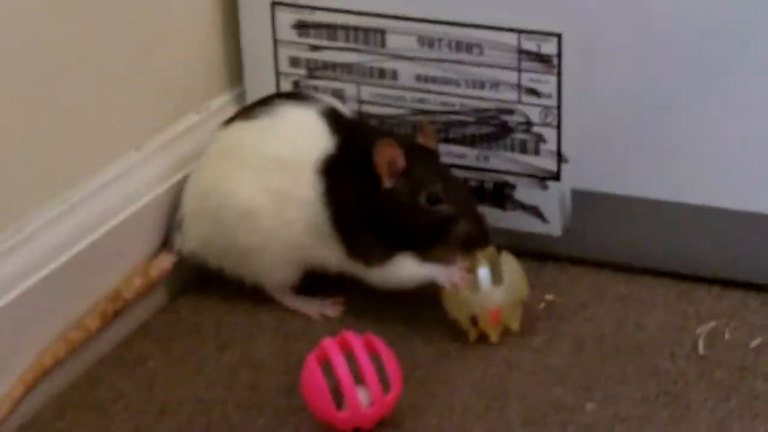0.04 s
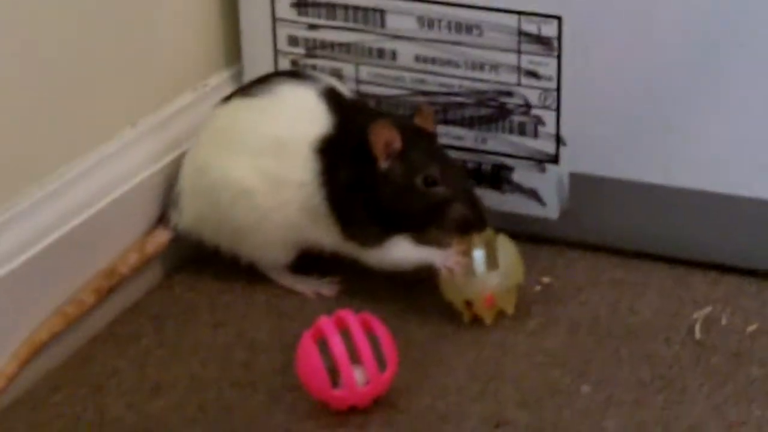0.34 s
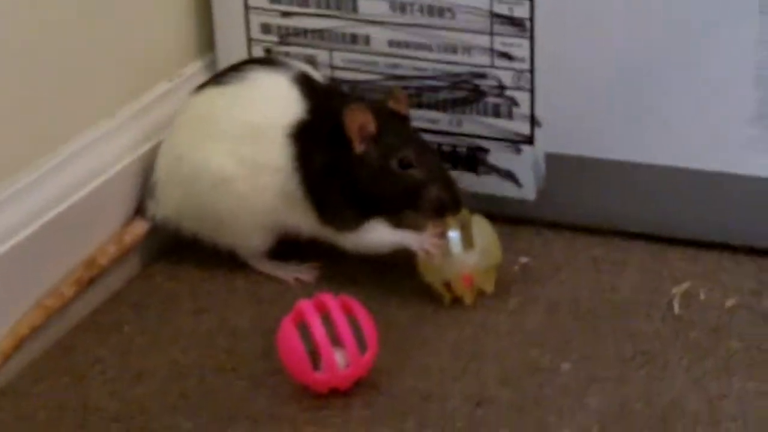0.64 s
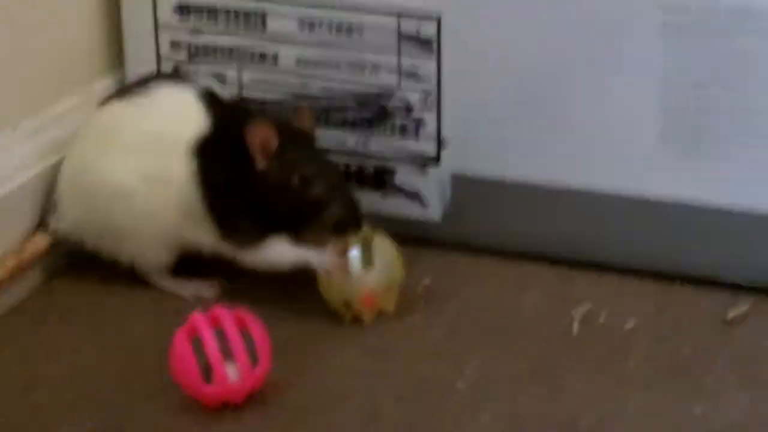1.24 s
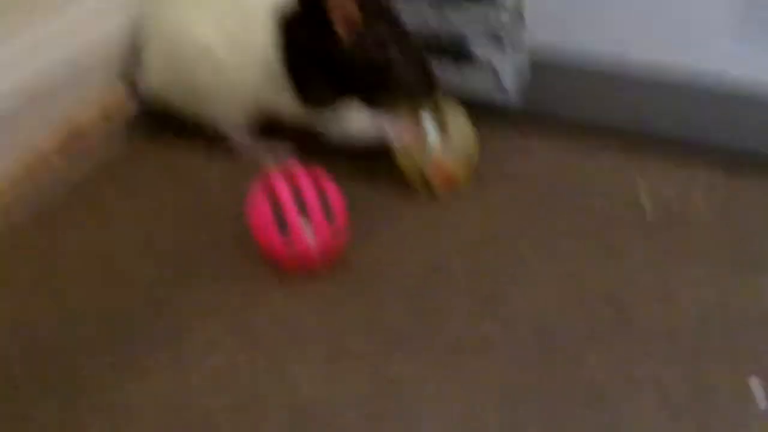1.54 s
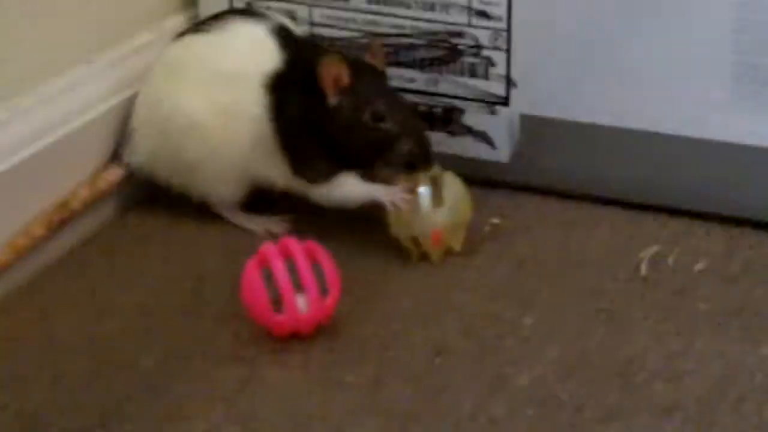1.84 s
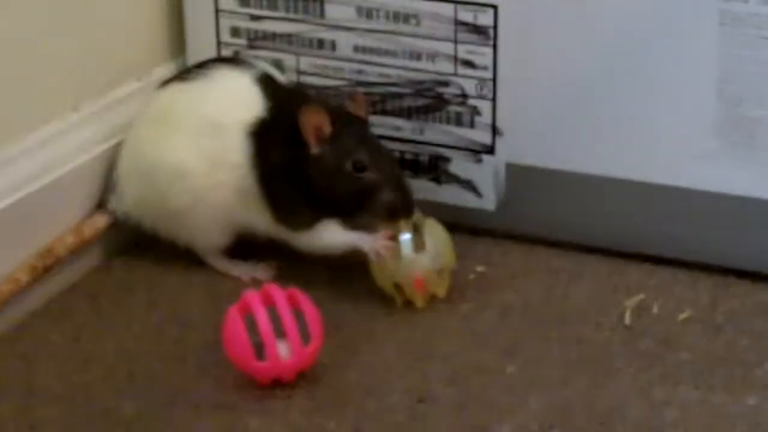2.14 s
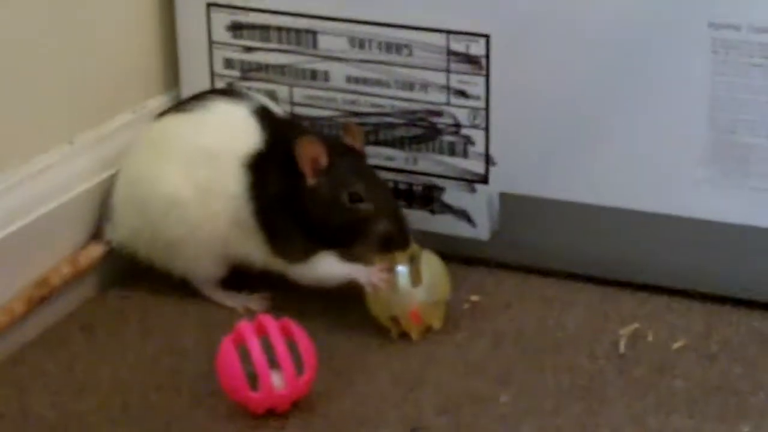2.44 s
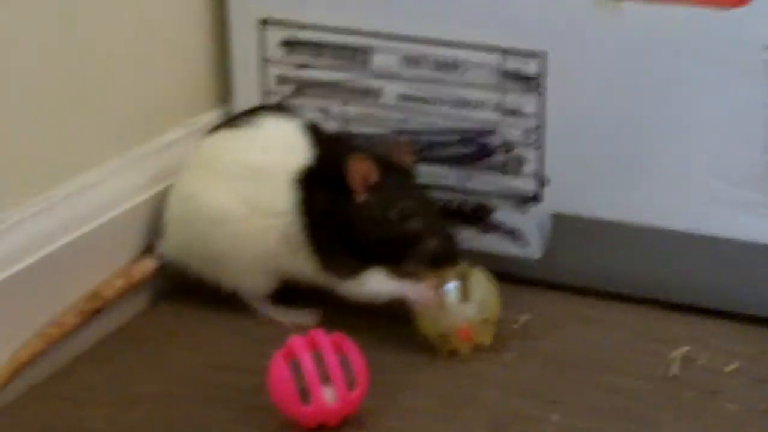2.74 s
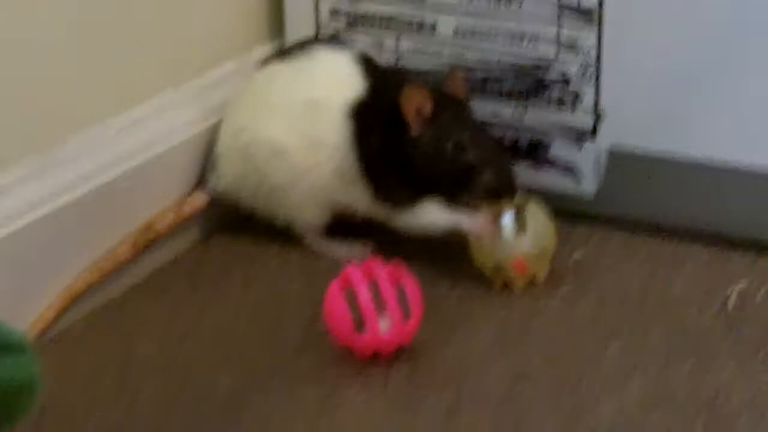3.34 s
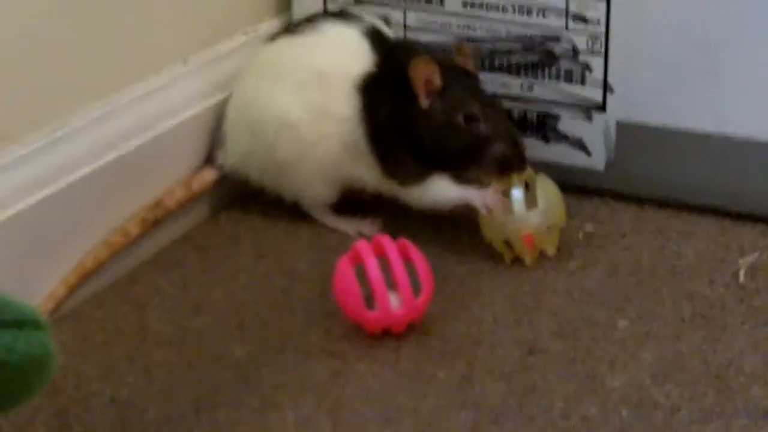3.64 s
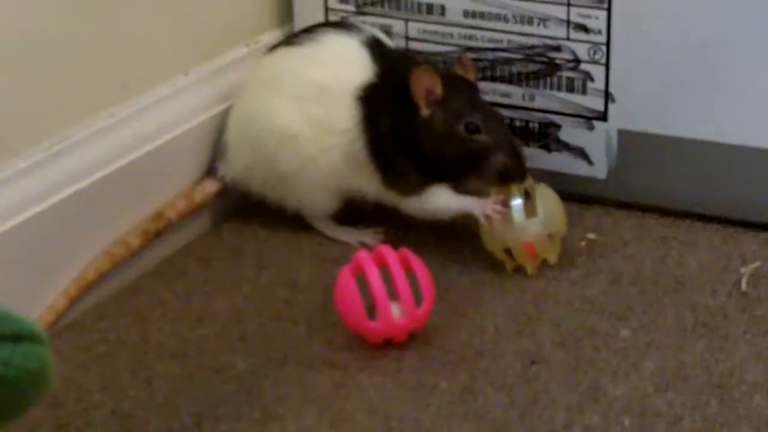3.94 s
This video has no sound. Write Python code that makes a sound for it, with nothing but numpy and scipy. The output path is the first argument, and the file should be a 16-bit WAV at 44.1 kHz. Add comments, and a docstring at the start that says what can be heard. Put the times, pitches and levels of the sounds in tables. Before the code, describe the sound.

A rat gnaws a hollow plastic ball, making light, irregular clicks in a quiet room.

```python
"""Sharp, hollow ticks come first: a rat's teeth and claws on a slotted plastic ball on a carpet.
A moment later the pellet inside touches a small bell and damps its ring.
Under it all lie a quiet room's low rumble and faint hiss, a distant fan's whirr and a motor hum.
Now and then paws scrape softly on the ball, and a hand-held camera rumbles twice as it moves."""
import sys
import numpy as np
from scipy import signal
from scipy.fft import rfft, irfft
from scipy.io import wavfile

SR = 44100
rng = np.random.default_rng(int(sys.argv[2]) if len(sys.argv) > 2 else 0)


def waveform_to_disk(signal):
    """Save audio, clipped to [-1, 1], as 16-bit WAV at the path in sys.argv[1]."""
    frames = np.transpose(np.atleast_2d(signal))
    scaled = np.clip(frames, -1, 1) * 32767
    samples = np.round(scaled).astype(np.int16)
    wavfile.write(sys.argv[1], SR, samples)


N = 176400  # 4 seconds


def amp(db):
    return 10 ** (np.asarray(db) / 20)


def unit(x):
    """Scales a sound to an average power of 1."""
    return x / np.sqrt(np.mean(x ** 2) + 1e-20)


def level_at(points, hz):
    """Reads between the rows of a frequency table, on a log-frequency axis."""
    f, db = np.transpose(points)
    return np.interp(np.log(hz + 1), np.log(f + 1), db)


def add(mix, start_s, sound):
    part = mix[max(round(start_s * SR), 0):][:len(sound)]
    part += sound[:len(part)]


def tone_filter(gain):
    """A filter with these gains that never rings before the hit (minimum phase)."""
    log_gain = np.log(np.maximum(np.r_[gain, gain[-2:0:-1]], 1e-5))
    return np.fft.ifft(np.exp(np.conj(signal.hilbert(log_gain)))).real


def noise(gain):
    """Steady noise with this gain at each frequency."""
    return irfft(rfft(rng.standard_normal(N)) * gain, N)


def drift(rate_hz):
    """A smooth random wobble of about size 1."""
    hz = np.fft.rfftfreq(N, 1 / SR)
    return unit(noise(np.exp(-(hz / rate_hz) ** 2)))


def burst(t, decay_s, rise_s=1e-5):
    """A puff of noise that swells and dies, with energy 1."""
    puff = rng.standard_normal(len(t)) * np.exp(-t / decay_s) * (1 - np.exp(-(t / rise_s) ** 2))
    return puff / np.linalg.norm(puff)


BODY_EDGE_HZ = 4700  # the shell's low "body" lies below this
# The notes the plastic shell rings at: f/Hz, relative level/dB, time to fade by 60 dB/s
SHELL_NOTES = [(1640, -18, 0.055), (1950, -29, 0.014), (2330, -29, 0.035), (3000, -15, 0.017),
               (3560, -21, 0.034), (6100, -21, 0.012), (6310, -27, .02), (7900, -17.5, 0.013)]
def shell_ring(t, body_db, ring_db=-11.5, spread_db=2, detune=.011, rise_s=.00065):
    """The shell rings hollow; the rat's grip changes each note's strength and pitch a little."""
    out = np.zeros(len(t))
    for hz, db, fade_s in SHELL_NOTES:
        level_db = ring_db + db + body_db * (hz < BODY_EDGE_HZ) + spread_db * rng.standard_normal()
        turns = hz * (1 + detune * rng.standard_normal()) * t + rng.random()
        out += amp(level_db) * 1e-3 ** (t / fade_s) * np.sin(2 * np.pi * turns)
    return out * (1 - np.exp(-t / rise_s))


# How the shell colours a tick or scrape: f/Hz, relative level/dB
SHELL_COLOUR = [(300, -30), (900, -20), (1700, 5), (2050, -2.5), (2350, 4), (2650, -0.5), (3300, 2.5),
                (3800, 0.5), (4300, -3.5), (5100, 3), (5900, 5), (6280, 3.5), (6850, -2), (7200, -6),
                (7900, -4.5), (8700, -4.5), (9300, -9), (10100, -7.5), (10900, -22), (13000, -18),
                (15500, -44)]
def tick(body_db, sparkle_db, decay_s=.00065, echo_s=.003, evenness=.28, size=2048):
    """A tooth slips: a tiny crunch and its close echoes pass through the shell and set it ringing."""
    t, hz = np.arange(size) / SR, np.fft.rfftfreq(size, 1 / SR)
    spectrum = rfft(burst(t, decay_s, rise_s=.00018))
    # evening out chance peaks makes the ticks more alike
    crunch = irfft(spectrum / abs(spectrum) ** evenness) * np.exp(-t / echo_s)
    echoes = .42 * burst(t, echo_s, rise_s=2 * decay_s)
    force = crunch / np.linalg.norm(crunch) + echoes
    body = 1 / (1 + (hz / BODY_EDGE_HZ) ** 8)
    sparkle = 1 - 1 / (1 + (hz / 8300) ** 16)  # the top of the treble
    colour = tone_filter(amp(level_at(SHELL_COLOUR, hz) + body_db * body + sparkle_db * sparkle))
    click = signal.fftconvolve(force, colour)[:size] / np.linalg.norm(force)
    return click + shell_ring(t, body_db)


# Each hit of a tooth or claw: t/s, relative level/dB, body boost/dB, sparkle boost/dB
BITES = [(.0094, -3, -13, 1), (.0123, -3, -3.5, 3), (.0268, 0, -16, -5), (.0622, -22, -8, -5),
         (.4684, -23, 5, 0), (.6012, -13, -6, 0), (0.603, -13.5, 1, -3), (1.2484, -8.5, -7, 2),
         (1.2620, -10, -11, -3), (1.2645, -15, -4, 0), (1.5038, -6, -14, 2.5), (1.519, -16, -1, -2),
         (1.7443, -10, -6, 6), (1.8583, -13, -4, -8), (1.8804, -9.5, -5.5, -3), (2.043, -17, -3, -6),
         (2.1687, -4, -1.5, 1.5), (2.18, -7, -13, -7), (2.2708, -16, -3, -2), (2.4875, -23, -6, 0),
         (2.6027, -15.5, -15, 0), (3.1099, -16, 7.5, 2), (3.1128, -16, 0, 2), (3.127, -9.5, -9, -6),
         (3.1372, -14, -6, 2), (3.2453, -11.5, 2, 7), (3.4273, 2, -6, -1), (3.4443, -3, -12, -4),
         (3.5355, -28, -8, 2), (3.6188, -2.5, -19, -8), (3.6335, -25, -8, 0), (3.9111, -8, 0, -8)]
def gnawing(gain_db=-20):
    """Teeth and claws tick on the plastic, singly or in quick clusters."""
    out = np.zeros(N)
    for start_s, db, body_db, sparkle_db in BITES:
        add(out, start_s, amp(gain_db + db) * tick(body_db, sparkle_db))
    return out


# The bell's two pairs of close notes: f/Hz, relative level/dB, time to fade by 60 dB undamped/s
BELL_LOW = [(9180, 0, .08), (9232, -6, .06)]
BELL_HIGH = [(9335, -7, .06), (9380, 1, .072)]
# Each touch of the pellet: t/s, relative level/dB, boost of the high pair/dB
JINGLES = [(.0115, -26, -3), (0.0286, 1.5, -16), (.605, -15, 7), (.6222, -7, -14), (.6560, -9, 2),
           (1.2490, -12, 0), (1.2640, -10, 2), (1.8815, -14, 6), (1.889, -21, 3), (2.1700, -12, 2),
           (2.1840, -16, 4), (2.2765, -12, 3), (2.612, -18, 3), (3.1280, -6.5, 1), (3.3530, -21, -2),
           (3.4280, -5, 0), (3.4453, 1, -10), (3.6200, -19, -2), (3.6345, -7, 8), (3.685, -13, -10),
           (3.7215, -13, -11), (3.8550, -13, 1), (3.912, -5, 4), (3.9300, -16, -3)]
def bell(gain_db=-51.5, rise_s=.002, damp_db=-5, damp_s=.011, size=8192):
    """The pellet rings the bell briefly; where it lands decides which pair of notes leads."""
    out, t = np.zeros(N), np.arange(size) / SR
    attack = np.minimum(t / rise_s, 1)
    damping = amp(damp_db * (1 - np.exp(-(t / damp_s) ** 2)))  # the pellet settles on the bell
    for start_s, db, high_db in JINGLES:
        ring = np.zeros(size)
        for notes, share in ((BELL_LOW, 1), (BELL_HIGH, amp(high_db))):
            phase = 2 * np.pi * rng.random()
            for hz, note_db, fade_s in notes:
                tone = np.sin(2 * np.pi * hz * t + phase + rng.uniform(-.5, .5))
                ring += share * amp(note_db) * 1e-3 ** (t / fade_s) * tone
        add(out, start_s, amp(gain_db + db) * attack * damping * ring / np.hypot(1, amp(high_db)))
    return out


def room_echo(sound, echo_db=-14, fade_s=.12):
    """The carpeted room adds only a short, weak echo."""
    t = np.arange(SR // 2) / SR
    tail = burst(t, fade_s / np.log(1000))  # falls 60 dB in fade_s
    return sound + amp(echo_db) * signal.fftconvolve(sound, tail)[:N]


# Room rumble, fan air and hiss: f/Hz, level in a 1 Hz band/dB
ROOM_AIR = [(1, -88.5), (9, -68), (18, -58.5), (30, -64.5), (42, -72.5), (58, -67.5), (80, -71), (100, -73),
            (114, -77.5), (145, -73), (180, -81), (230, -86), (400, -88), (560, -90), (720, -92),
            (840, -86.5), (930, -91.5), (1120, -93.5), (1400, -96), (1800, -101), (2500, -103),
            (3000, -104), (3750, -104), (4300, -108), (6400, -107), (7300, -110), (9000, -115),
            (12500, -117), (13300, -123), (15300, -125)]
def room_air():
    """The room's steady noise: strongest in the deep bass, faint in the treble."""
    hz = np.fft.rfftfreq(N, 1 / SR)
    return noise(amp(level_at(ROOM_AIR, hz)) * np.sqrt(SR / 2))


# The narrow bands where the fan rings: f/Hz, width/Hz, relative level/dB
FAN_BANDS = [(376, 12, -77), (501, 7, -74), (597, 10, -78), (838, 18, -77.5), (996, 16, -73),
             (1030, 11, -72), (1071, 8, -79), (1134, 13, -76), (1210, 16, -82), (1379, 7, -81),
             (1492, 9, -80), (1659, 10, -81), (1949, 14, -83), (2040, 8, -86), (2104, 14, -77.5),
             (2222, 20, -84), (2551, 12, -86), (2645, 25, -84), (6282, 4, -96), (7865, 4, -95)]
def fan(gain_db=2.1, rise_db_per_s=.06):
    """Noise rings in the distant fan and grows very slightly louder."""
    hz, t = np.fft.rfftfreq(N, 1 / SR), np.arange(N) / SR
    power = sum(amp(db) ** 2 * 2 / (np.pi * width) / (1 + ((hz - centre) / width) ** 2) ** 2
                for centre, width, db in FAN_BANDS)
    return amp(gain_db + rise_db_per_s * (t - t.mean())) * noise(np.sqrt(power * SR / 2))


# The low tones of household motors: f/Hz, level/dB
MOTOR_TONES = [(32.6, -53), (89.8, -61), (97.9, -53), (120, -68)]
def motor_hum(pitch_waver=.004, level_waver=.24):
    """Motors hum in low tones that waver a little and throb against each other."""
    out = np.zeros(N)
    for hz, db in MOTOR_TONES:
        turns = np.cumsum(hz * (1 + pitch_waver * drift(rate_hz=3.5))) / SR + rng.random()
        strength = 1 + level_waver * drift(rate_hz=1)
        out += amp(db) * unit(strength * np.sin(2 * np.pi * turns))
    return out


def fan_whirr(pitch_hz=4087, wander_hz=35, pulses_per_s=30, sharpness=2.5, level_db=-81.3):
    """The fan gives a thin, unsteady tone in quick, even pulses."""
    t = np.arange(N) / SR
    turns = np.cumsum(pitch_hz + wander_hz * drift(rate_hz=60)) / SR
    pulses = np.exp(sharpness * np.cos(2 * np.pi * pulses_per_s * t))
    return amp(level_db) * unit(np.sin(2 * np.pi * turns) * pulses)


# Each soft scrape of a paw on the ball: t/s, length/s, level at its middle/dB
SCRAPES = [(0.76, .05, -73), (0.912, 0.046, -65), (0.948, 0.17, -71.5), (1.137, 0.23, -78),
           (1.731, 0.061, -72), (3.456, .04, -78), (3.912, 0.034, -68)]
def paw_scrapes(grains_per_s=2500, spread_db=2.5, body_db=-3):
    """Claws drag over the shell, making a short run of tiny clicks, or grains."""
    out, hz = np.zeros(N), np.fft.rfftfreq(512, 1 / SR)
    colour = tone_filter(amp(level_at(SHELL_COLOUR, hz) + body_db * (hz < BODY_EDGE_HZ)))
    for start_s, length_s, db in SCRAPES:
        grains = rng.standard_normal(SR) * amp(spread_db * rng.standard_normal(SR))
        grains *= rng.random(SR) < grains_per_s / SR  # keep a random few
        scrape = unit(signal.fftconvolve(grains, colour))
        swell = np.sqrt(np.hanning(round(length_s * SR)))
        add(out, start_s, amp(db) * swell * scrape[:len(swell)])
    return out


# The colour of the moving camera's rumble: f/Hz, relative level/dB
HANDLING_COLOUR = [(1, -19), (10, 10), (25, 3), (45, -13), (63, 10), (85, -9), (200, -46), (350, -24.5),
                   (600, -27), (2000, -87)]
# Each move of the hand: middle t/s, spread to either side/s, relative level/dB
HAND_MOVES = [(1.28, 0.19, -46), (1.78, 0.09, -45)]
def handling(sway_hz=7, waver=.3, flutter=.6, sway_db=5):
    """A hand-held camera sways; its soft rumble swells with each move and flutters with each swing."""
    hz, t = np.fft.rfftfreq(N, 1 / SR), np.arange(N) / SR
    rumble = noise(amp(level_at(HANDLING_COLOUR, hz)))
    turns = np.cumsum(sway_hz * (1 + waver * drift(sway_hz))) / SR
    sway = np.sin(2 * np.pi * turns)
    swell = sum(amp(db) * np.exp(-((t - middle) / spread) ** 2) for middle, spread, db in HAND_MOVES)
    return swell * (unit(rumble * (1 + flutter * sway)) + amp(sway_db) * unit(sway))


def scene():
    """The ball and its echo join the background sounds in one channel."""
    ball = room_echo(gnawing() + paw_scrapes() + bell())
    return (ball + room_air() + fan() + motor_hum() + fan_whirr() + handling())[None]


def record(dry, notch_hz=5470, half_width_hz=680, notch_gain=.055, top_hz=15300, offset=.0167):
    """The microphone cuts a deep notch in the treble, loses the very top and adds a steady offset."""
    distance = (np.fft.rfftfreq(1024, 1 / SR) - notch_hz) / half_width_hz
    notch = tone_filter(np.sqrt((distance ** 2 + notch_gain ** 2) / (distance ** 2 + 1)))
    notched = signal.oaconvolve(dry, notch[None])[:, :N]
    low_pass = signal.firwin(511, top_hz, window=("kaiser", 9), fs=SR)
    return offset + signal.oaconvolve(notched, low_pass[None], "same")


dry = scene()
out = record(dry)
waveform_to_disk(out)
```